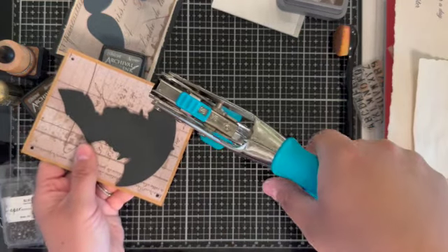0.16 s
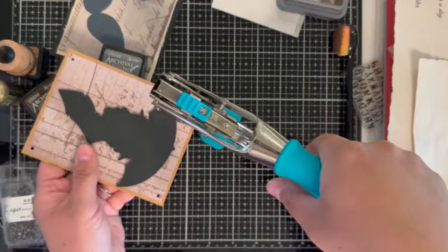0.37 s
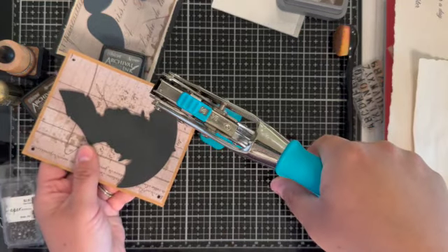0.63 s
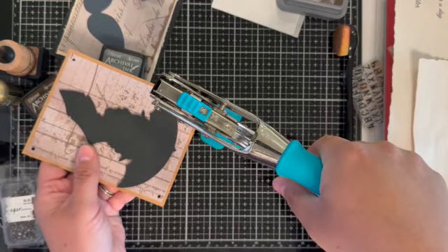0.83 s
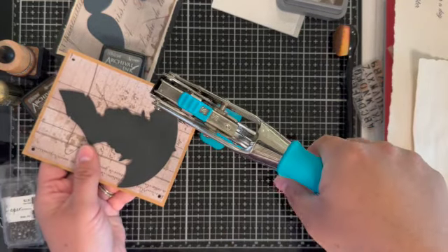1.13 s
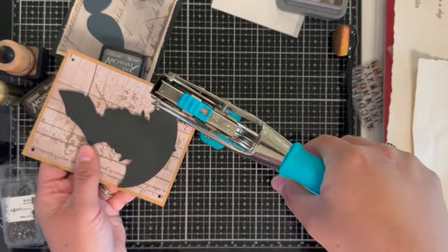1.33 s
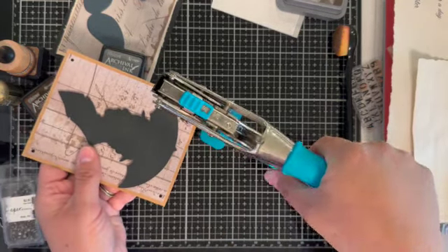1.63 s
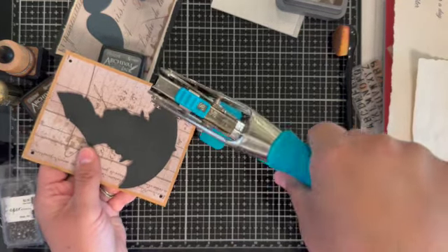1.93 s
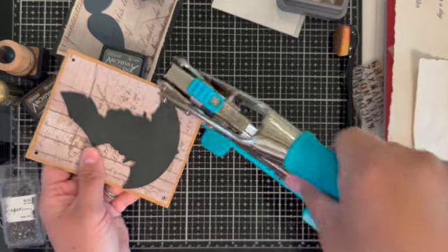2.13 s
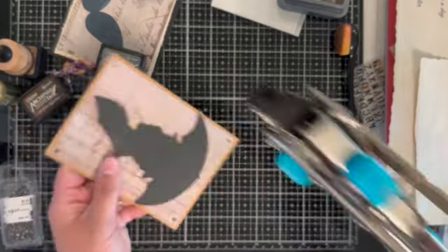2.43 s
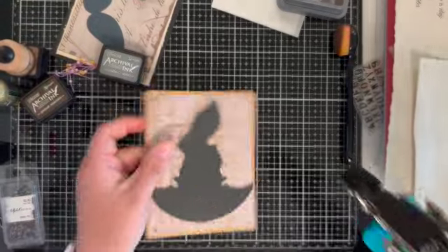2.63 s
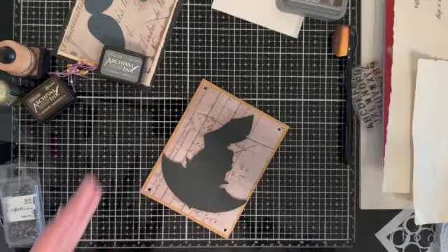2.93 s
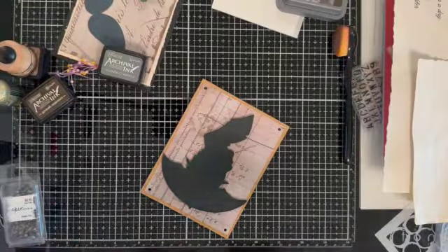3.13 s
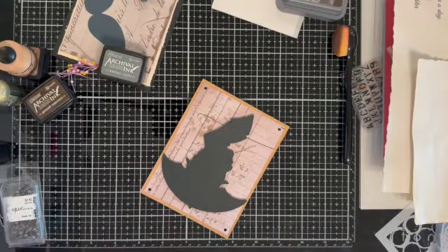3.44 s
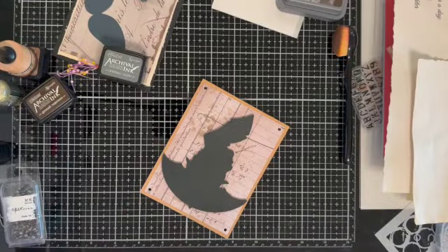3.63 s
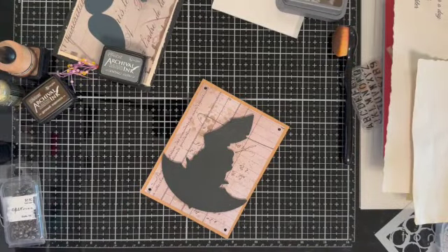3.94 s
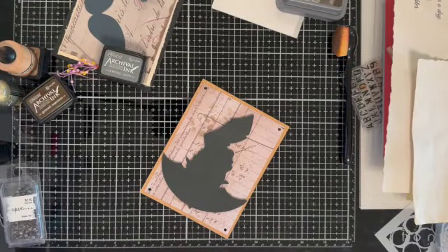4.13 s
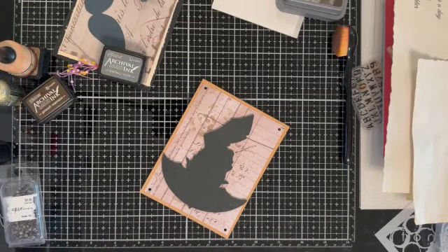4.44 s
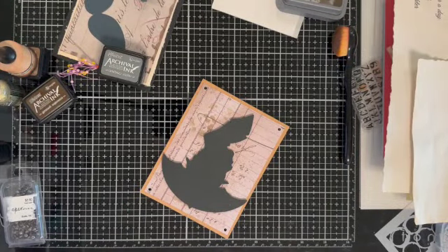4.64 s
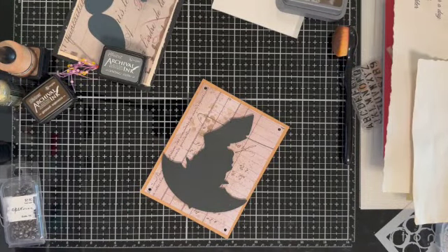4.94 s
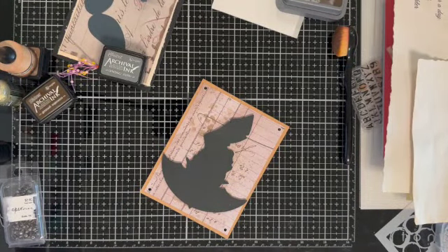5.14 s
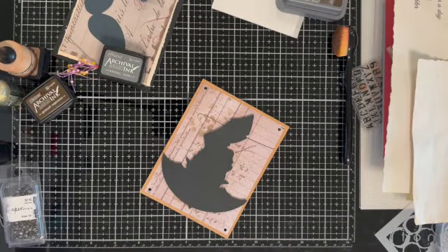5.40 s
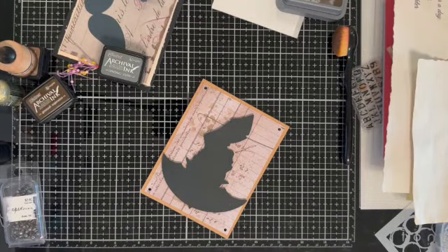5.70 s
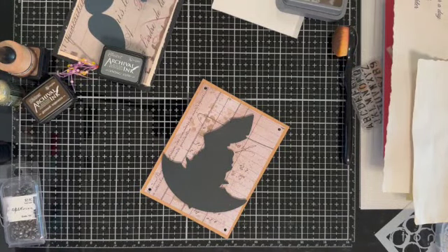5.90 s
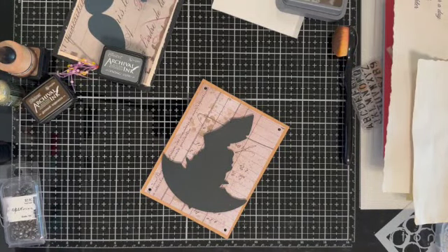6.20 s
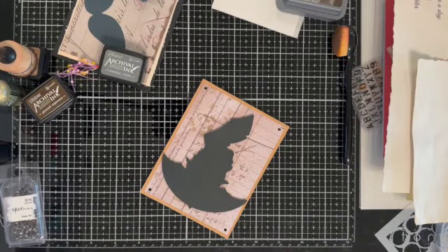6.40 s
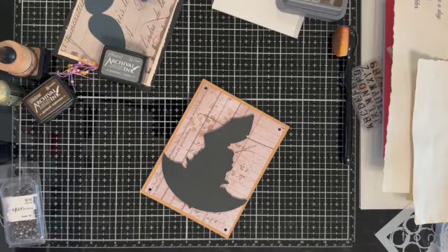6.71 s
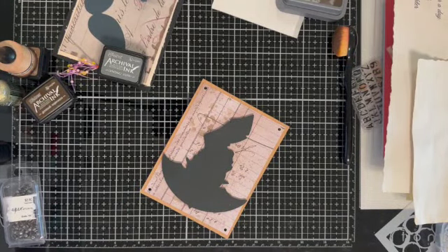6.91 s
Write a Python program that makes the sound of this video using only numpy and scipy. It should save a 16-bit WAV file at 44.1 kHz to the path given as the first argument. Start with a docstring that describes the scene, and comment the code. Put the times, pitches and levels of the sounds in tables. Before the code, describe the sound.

Close, a steel hand punch creaks, snaps through thick card and clacks open; later a drawer rolls, tools clatter, and it thumps shut over low hum.

```python
"""Mains hum and a throbbing low drone fill a small room; light taps, ticks and rubs follow over a desk.
Up close, a steel hand punch squeezes thick card: creaks are stick-slip pulses on the jaws' modes, snaps
are noise bursts over rings of die, frame and steel, and the break is a noise crunch with a modal thud.
Then the open tool clacks and the card is laid down. Further off a drawer rolls out on rumbling, singing
noise, the tool clatters into it, scrapes rasp, and it rolls shut with a thump of wooden modes."""
import sys
import numpy as np
from scipy import signal
from scipy.io import wavfile

SR = 44100
rng = np.random.default_rng(int(sys.argv[2]) if len(sys.argv) > 2 else 0)


def transcribe(u):
    """Save the signal u as a 16-bit wav file named by the first command-line argument.

    u: samples, shape (n,) or (channels, n), limited to [-1, 1]; the rate is SR.
    q: integer samples, one column per channel.
    """
    v = np.clip(np.atleast_2d(u).T, -1, 1)
    q = np.round(v * 32767).astype(np.int16)
    wavfile.write(sys.argv[1], SR, q)


N = 311346
TIME = np.arange(N) / SR  # s
CUTOFF_HZ = 16700
BREAK_S = 1.8325  # the die breaks through the card
OPEN_S = 2.0  # the hand lets go; from here snaps ring the sprung-open punch

# Table levels are relative; each layer adds its own trims.
# Steady hum tones: f/Hz, mean level/dB rms
HUM_TONES = [(120, -47), (193, -60.5), (241, -57), (440, -64), (481, -66.5)]
# The drone swells and sinks back: t/s at the top, level/dB, half length/s
DRONE_SURGES = [(0.103, -35, 0.14), (0.694, -34, 0.14), (2.776, -40.5, 0.22), (3.974, -42, 0.16)]
# Colour of still room air: f/Hz, level/dB per Hz
AIR_COLOUR = [(35, -12), (55, -5), (130, -15), (240, -17.5), (410, -25), (700, -28), (1000, -47),
              (2700, -53.5), (16000, -87)]
# Room decay: f/Hz, t60/s
ROOM_DECAY = [(100, 0.63), (500, 0.5), (2000, 0.52), (6000, 0.41), (14000, 0.22)]
# How far the echoes differ between channels: f/Hz, side level/dB
ECHO_SPREAD = [(250, -13.5), (550, -0.5), (1100, 0.5), (1900, -24.5), (3000, 3), (6500, -23),
               (10000, -34.5)]
# Bands where the drawer and thumps lean to one channel: f/Hz, width/Hz, share towards the left
DRAWER_LEAN = [(898, 480, -0.54), (2300, 480, 0.72)]
# All-pass phase turns of the left channel: f/Hz, width/Hz
LEFT_PHASE = [(4950, 325), (11700, 4170)]
# Soft blows on the desk and of the drawer, strongest as it meets its stops: t/s, level/dB, strongest f/Hz
THUMPS = [(1.345, -28.5, 120), (1.500, -29.5, 113), (5.369, -11.5, 150), (5.440, -18.5, 115),
          (5.464, -14.5, 340), (5.476, -9.5, 170), (5.510, -18, 62), (6.215, -19.5, 390),
          (6.992, -6.5, 490), (7.000, 1.5, 120), (7.018, -11, 74)]
# Modes of the ringing wood: f/Hz, level/dB, t60/s
WOOD_MODES = [(72.55, -5.5, 0.97), (108.4, 2, 0.11), (143.4, -1.5, 0.13), (171.8, 3, 0.15),
              (238.8, -16, 0.37), (326.5, -7.5, 0.052), (520, -7.5, 0.05)]
# Pushes on the drawer: start t/s, rumble level/dB at top speed, push/s, coast/s
DRAWER_PUSHES = [(4.42, -34, .24, .42), (5.42, -34, 0.088, 0.2), (6.14, -31.5, 0.14, .39)]
# Rough tones of the wheels at top speed: f/Hz, level/dB
WHEEL_TONES = [(205, -17), (315, -13), (510, -14), (880, -22)]
# Colour of the wheels' rumble: f/Hz, level/dB per Hz
RUMBLE_COLOUR = [(40, -7), (75, 5), (150, 6.5), (330, -9), (520, -7.5), (1000, -15), (2000, -19.5),
                 (3000, -61)]
# Colour of the wheels' hiss: f/Hz, level/dB per Hz
HISS_COLOUR = [(1500, -2), (2500, 4.5), (5000, -3.5), (8000, 1.5), (11000, -7.5), (16000, -26)]
# Knocks in the drawer: t/s, level/dB, decay/s, strongest f/Hz, fall to either side/dB per octave
CLATTER_HITS = [(5.356, -33.5, 0.009, 7940, 3.5), (5.365, -35.5, 0.073, 8000, -0.5),
                (5.508, -21, 0.013, 6050, 2.5), (5.717, -34.5, 0.0038, 7800, 12),
                (6.112, -39, 0.02, 4120, 3.5), (6.163, -33, 0.037, 7000, 3.5), (6.203, -20, 0.025, 2680, 4),
                (6.973, -39, 0.014, 6040, 0.5), (6.990, -21.5, 0.022, 1080, 4)]
# Colour of the knocks: f/Hz, level/dB per Hz
CLATTER_COLOUR = [(150, 13), (400, 19), (900, 13), (1400, 6), (2500, 3.5), (5000, 0.5), (8000, 7),
                  (11000, -9), (16000, -27)]
# Ring of the drawer's tray: f/Hz, level/dB, t60/s
TRAY_MODES = [(404, 7, 0.15), (780, 7, 0.044), (1260, -12, 0.14), (1920, -19, 0.037), (3940, -18, 0.15),
              (7400, -24, 0.042)]
# Things dragged over one another: t/s, level/dB, decay/s, f/Hz
SCRAPES = [(2.701, -39.5, 0.009, 1600), (3.931, -35.5, 0.042, 2400), (5.7003, -26, 0.023, 1300),
           (5.733, -34.5, 0.022, 1480), (5.983, -38.5, 0.018, 1390), (6.9977, -18.5, 0.0037, 1240)]
# Light taps and ticks of punch, card and fingers: t/s, level/dB, f/Hz
TAPS = [(0.031, -34, 1080), (0.542, -43.5, 7540), (0.728, -45, 1400), (1.034, -40.5, 1580),
        (1.538, -37, 900), (2.698, -18.5, 1460), (2.8798, -24, 3750)]
# Sliding card, steel and hands, and rustling clothes:
# t/s at full strength, hold/s, level/dB, rise/s, release/s, extra treble/dB
STROKES = [(1.14, 0.089, -58.5, 0.024, 0.084, 6), (1.246, 0.19, -51.5, 0.0046, 0.029, 5),
           (1.647, 0.016, -40, 0.002, 0.0078, 4.5), (1.784, 0.072, -35.5, 0.062, 0.057, -31),
           (2.116, 0.05, -37.5, 0.0062, 0.01, -2), (2.194, 0.039, -34.5, 0.0029, 0.0058, 4),
           (2.454, 0.1, -53.5, 0.029, 0.085, 7.5), (2.754, 0.028, -50.5, 0.092, 0.0073, 11.5),
           (2.844, 0.18, -60.5, 0.02, 0.055, 7.5), (3.387, 0.12, -49, 0.064, 0.08, -13),
           (3.929, 0, -44.5, 0.064, 0.21, -4), (4.515, 0.18, -43, 0.052, 0.037, -22),
           (5.713, 0.66, -43.5, 0.47, 0.21, -6)]
# Colour of the rubbing: f/Hz, level/dB per Hz
RUB_COLOUR = [(400, 5), (900, 4), (1900, 1), (3200, -4.5), (8400, -2.5), (11000, -5), (15000, -32)]
# Card creaks in the tightening jaws: t/s, length/s, level/dB rms, slips per s, strongest f/Hz
CREAKS = [(1.219, 0.014, -40.5, 325, 646), (1.239, 0.035, -35, 190, 489), (1.351, 0.058, -36.5, 187, 330)]
# Hollow knocks of the jaws, with one dull thud after them: t/s, level/dB, strongest f/Hz
HOLLOW_KNOCKS = [(1.326, -15.5, 326), (1.678, -24.5, 280), (1.748, -25.5, 305), (2.110, -28, 530),
                 (2.222, -24, 530), (3.415, -24.5, 217)]
# Hollow ring of the jaws: f/Hz, level/dB, t60/s
JAW_MODES = [(281.6, 1.5, 0.051), (367, 2.5, 0.092), (453, -7.5, 0.085), (630, 8, 0.049), (1100, -8, 0.042)]
# Ring of card and desk at the break: f/Hz, level/dB, t60/s
CARD_MODES = [(81, -11, 0.049), (284, -10, 0.049), (424, -21, 0.084), (620, -16, 0.18), (840, -14, 0.089),
              (1320, -35, 0.055)]
# Colour of the tearing fibres: f/Hz, level/dB per Hz
CRUNCH_COLOUR = [(150, -7), (650, 4.5), (1500, 6.5), (2500, -12), (5000, -52)]
# Colour of the freed card's shudder: f/Hz, level/dB per Hz
SHUDDER_COLOUR = [(80, 0), (220, 3), (450, -6.5), (900, -9.5), (2500, -55)]
# Clicks of the punch: t/s, crack level/dB, frame level/dB, frame f/Hz
SNAPS = [(1.13, -28.5, -36, 2800), (1.145, -25, -29, 3160), (1.3257, -27, -23.5, 1290),
         (1.336, -23.5, -28.5, 1480), (1.4133, -37, -28, 2760), (1.432, -27, -34, 4500),
         (1.657, -21.5, -33.5, 2940), (1.6712, -10.5, -22.5, 3900), (1.6793, -10.5, -17.5, 1370),
         (1.7332, -34, -24, 5000), (1.740, 0.5, -4, 1360), (1.7554, -17, -21.5, 1160),
         (1.774, -10.5, -31, 1280), (1.81, -21, -27, 1400), (2.100, -29, -27.5, 1170),
         (2.108, -7.5, -7.5, 1130), (2.1732, -14, -13, 1080), (2.2162, -4.5, -8, 1140),
         (2.228, -11.5, -15.5, 900), (2.255, -20, -25, 1100), (2.2723, -18, -19, 1030)]
# Colour of a crack: f/Hz, level/dB per Hz
CRACK_COLOUR = [(150, -30), (400, 8), (1300, -5.5), (2600, 2), (4500, 2), (8500, 2.5), (11000, -1.5),
                (16000, -22.5)]
# Heavily damped die and guide: f/Hz, level/dB squeezed, level/dB open, t60/s
DIE_MODES = [(1055, 1, -9, 0.025), (1800, -7, 1.5, 0.016), (3180, -13, -10, 0.012), (4510, -6.5, 4, 0.0098),
             (5460, -9.5, -3.5, 0.0088), (9020, -0.5, 1, 0.0041)]
# Ring of the steel: f/Hz, level/dB squeezed, level/dB open, t60/s
STEEL_MODES = [(865, -10.5, 10.5, 0.031), (1292, -4.5, 3.5, 0.06), (1395, 1.5, 1.5, 0.055),
               (1747, -9, 3.5, 0.035), (2210, -15.5, -11, 0.05), (2610, 0.5, -17, 0.064),
               (3194, -7, -15, 0.039), (3840, -8, -21, 0.04), (5600, -18.5, -16, 0.041)]


def from_db(db):
    """Decibels to gain."""
    return 10 ** (np.asarray(db) / 20)


def rms_one(x):
    """Scale to unit rms."""
    return x / np.sqrt(np.mean(x ** 2) + 1e-20)


def at_hz(points, hz):
    """Read a table on a log-frequency axis."""
    f, value = np.transpose(points)
    return np.interp(np.log(hz), np.log(f), value)


def octaves_off(hz, pitch):
    """Distance from a favoured pitch in octaves."""
    return abs(np.log2(hz / pitch))


def drift(rate):
    """Random wander: normal knots of spread 1, rate per second, joined by straight lines."""
    knots = rng.standard_normal(int(rate * N / SR) + 2)
    return np.interp(TIME * rate, np.arange(len(knots)), knots)


def filtered(x, order, hz, kind):
    """Butterworth filter."""
    return signal.sosfilt(signal.butter(order, hz, kind, fs=SR, output="sos"), x)


def noise_bands(size):
    """Half-octave bands of noise as (centre Hz, samples); neighbours are unrelated."""
    edges = 33 * 2 ** np.arange(0, 9.1, .5)
    white = rng.standard_normal((2, size))
    bands = []
    for k, (lo, hi) in enumerate(zip(edges, edges[1:])):
        bands.append((np.sqrt(lo * hi), filtered(white[k % 2], 2, [lo, hi], "band")))
    return bands


def noise(spectrum):
    """Coloured noise of unit rms."""
    return rms_one(sum(from_db(at_hz(spectrum, hz)) * band for hz, band in noise_bands(N)))


def around(x, hz, ratio=1.68):
    """Keep the band round a pitch."""
    return filtered(x, 2, [hz / ratio, min(hz * ratio, SR / 2 - 1)], "band")


def swell(rise_s, decay_s, size=SR // 2):
    """An envelope that rises and dies away; top 1."""
    t = TIME[:size]
    shape = (1 - np.exp(-(t / rise_s) ** 2)) * np.exp(-t / decay_s)
    return shape / shape.max()


def stroke(s, hold_s, rise_s, release_s):
    """Pressure grows, holds and lets go; top 1."""
    before = np.maximum(s - TIME, 0)
    after = np.maximum(TIME - s - hold_s, 0)
    return np.exp(-before / rise_s - after / release_s)


def mode(hz, t60, rise_cycles):
    """A struck mode builds up over some cycles, so lows come later."""
    envelope = swell(rise_cycles / hz, t60 / np.log(1000))
    return envelope * np.sin(2 * np.pi * hz * TIME[:SR // 2])


def focused_ring(modes, pitch, db, focus_db, rise_cycles):
    """Ring a body's modes, weaker by focus_db for each octave away from the favoured pitch."""
    return sum(from_db(db + level - focus_db * octaves_off(hz, pitch)) * mode(hz, t60, rise_cycles)
               for hz, level, t60 in modes)


def add(track, s, sound):
    """Mix a sound in at a time."""
    i = int(s * SR)
    track[i:i + len(sound)] += sound[:N - i]


def burst(source, envelope):
    """A random stretch of noise under an envelope, with the envelope's energy."""
    i = int(rng.random() * (N - len(envelope)))
    return rms_one(source[i:i + len(envelope)] * envelope) * np.sqrt(np.mean(envelope ** 2))


def knocks(blows, modes, focus_db):
    """Soft blows ring a body most strongly near the pitch that each contact favours."""
    out = np.zeros(N)
    for s, db, pitch in blows:
        add(out, s, focused_ring(modes, pitch, db, focus_db, rise_cycles=0.75))
    return out


def phase_turn(x, hz, width):
    """All-pass resonance: delays what lies near its pitch."""
    b, a = signal.iirnotch(hz, hz / width, fs=SR)
    return signal.lfilter(a[::-1], a, x + 1e-18)


def diffuse(mid, side, apart_hz=380):
    """Sound from all round is alike in both channels in the bass, different above."""
    return mid + filtered(side, 2, apart_hz, "high") * [[1], [-1]]


def background(drone_hz=43.4, drone_db=-52.0, overtone_db=-13.0, air_db=-44.0, air_side_db=-0.5):
    """Wavering mains hum, a throbbing drone with its octave, and still room air."""
    hum = np.zeros(N)
    for hz, db in HUM_TONES:
        level = np.sqrt(2) * from_db(db + drift(rate=2.97))
        hum += level * np.sin(2 * np.pi * hz * TIME + 0.57 * drift(rate=3.07))
    turn = 2 * np.pi * drone_hz * TIME + 2.46 * drift(rate=1.0)
    throb = np.full(N, from_db(drone_db))
    for s, db, half_s in DRONE_SURGES:
        throb += from_db(db) * np.exp(-((TIME - s) / half_s) ** 2)
    drone = np.sqrt(2) * throb * (np.sin(turn) + from_db(overtone_db) * np.sin(2 * turn))
    air = diffuse(noise(AIR_COLOUR), from_db(air_side_db) * noise(AIR_COLOUR))
    return hum + drone + from_db(air_db) * air


def room(x):
    """Diffuse echoes, a noise tail that dies band by band."""
    t = TIME[:SR // 2]
    mid, side = np.zeros(len(t)), np.zeros(len(t))
    for hz, band in noise_bands(len(t)):
        mid += band * from_db(-60 * t / at_hz(ROOM_DECAY, hz))
    for hz, band in noise_bands(len(t)):
        side += band * from_db(at_hz(ECHO_SPREAD, hz) - 60 * t / at_hz(ROOM_DECAY, hz))
    echoes = diffuse(mid, side) * (1 - np.exp(-(t / 0.00105) ** 2))  # soft onset
    echoes = echoes / np.sqrt(np.sum(echoes ** 2) / 2)
    return signal.fftconvolve(x[None], echoes, axes=1)[:, :N]


def off_axis(x):
    """Sound from beside the desk is coloured differently in each channel."""
    side = np.zeros(N)
    for hz, width, share in DRAWER_LEAN:
        side += share * signal.lfilter(*signal.iirpeak(hz, hz / width, fs=SR), x + 1e-18)
    return x + side * [[1], [-1]]


def wood_thumps(level_db=-3.5):
    """Soft blows on the desk and of the drawer ring the wood."""
    return from_db(level_db) * knocks(THUMPS, WOOD_MODES, focus_db=6.0)


def runners(hiss_db=-16.0, bump_db=4.0, glide=.25, tone_width_hz=35):
    """Drawer wheels rumble, sing and hiss over small bumps; level and pitch sink as the drawer slows."""
    speed = np.zeros(N)
    for s, db, push_s, coast_s in DRAWER_PUSHES:
        add(speed, s, from_db(db) * swell(push_s, coast_s, size=N))
    turn = 2 * np.pi * np.cumsum((speed / speed.max()) ** glide) / SR
    tones = np.zeros(N)
    for hz, db in WHEEL_TONES:
        # two independent drifts roughen each tone into a narrow band
        rough = drift(tone_width_hz) * np.sin(hz * turn) + drift(tone_width_hz) * np.cos(hz * turn)
        tones += from_db(db) * rough
    bumps = from_db(bump_db * drift(rate=51))
    return speed * bumps * (noise(RUMBLE_COLOUR) + tones + from_db(hiss_db) * noise(HISS_COLOUR))


def scraping(grain_db=6.5, grains_per_s=300):
    """Dragged things rasp: a quick start, then a dying run of coarse grains."""
    out, white = np.zeros(N), rng.standard_normal(N)
    grains = white * from_db(grain_db * drift(rate=grains_per_s))
    for s, db, decay_s, hz in SCRAPES:
        add(out, s, from_db(db) * burst(around(grains, hz), swell(0.0012, decay_s)))
    return out


def clatter(level_db=-0.5, rattle_db=7.5, first_db=4.0, tray_db=-7.5):
    """Loose tools knock in the tray: a hard first contact, a quick uneven rattle, and the tray's ring."""
    out, bands = np.zeros(N), noise_bands(N)
    contacts = from_db(rattle_db * drift(rate=540))
    for s, db, decay_s, pitch, fall_db in CLATTER_HITS:
        colour = np.zeros(N)
        for hz, band in bands:
            colour += from_db(at_hz(CLATTER_COLOUR, hz) - fall_db * octaves_off(hz, pitch)) * band
        colour = rms_one(colour)
        add(out, s, from_db(db + first_db) * burst(colour, swell(0.0013, 0.0046)))
        add(out, s, from_db(db + level_db) * burst(colour * contacts, swell(0.0042, decay_s)))
        add(out, s, focused_ring(TRAY_MODES, pitch, db + tray_db, fall_db, rise_cycles=1.0))
    return out


def handling(tap_db=-6.5, grain_db=1.5, catch_db=3.0, rest_db=-72.5, treble_hz=5000):
    """Punch, card and fingers tap and tick; card, steel, hands and clothes rub with a fine, catching grain."""
    grain = from_db(grain_db * drift(rate=110) + catch_db * drift(rate=23))
    rub = grain * noise(RUB_COLOUR)
    treble = filtered(rub, 1, treble_hz, "high")
    out = from_db(rest_db) * rub  # the hands are never quite still
    for s, hold_s, db, rise_s, release_s, treble_db in STROKES:
        slide = rub + (from_db(treble_db) - 1) * treble
        out += from_db(db) * stroke(s, hold_s, rise_s, release_s) * slide
    white = rng.standard_normal(N)
    for s, db, hz in TAPS:
        add(out, s, from_db(db + tap_db) * burst(around(white, hz), swell(0.00025, 0.0024)))
    return out


def creaking(jitter=0.15, focus_db=14.5):
    """The card sticks and slips in quick, uneven runs that keep the jaws ringing, favouring a pitch per run."""
    out = np.zeros(N)
    for s, length_s, db, rate, pitch in CREAKS:
        ring = focused_ring(JAW_MODES, pitch, 0, focus_db, rise_cycles=1.0)
        slips = np.zeros(int(length_s * SR))
        gaps = abs(1 + jitter * rng.standard_normal(size=40))
        at = (np.cumsum(gaps) * SR / rate).astype(int)
        slips[at[at < len(slips)]] = 1
        run = signal.fftconvolve(slips, ring)
        # set the level over the slipping time, not over the ring-out
        add(out, s, from_db(db) * np.sqrt(len(slips) / len(run)) * rms_one(run))
    return out


def hollow_knocks(level_db=0.0):
    """The jaws knock with a hollow ring, and one dull thud comes after them."""
    return from_db(level_db) * knocks(HOLLOW_KNOCKS, JAW_MODES, focus_db=17.5)


def cutting(crunch_db=-15.5, crunch_rise_s=0.017, crunch_s=0.0058, grain_db=3.5,
            shudder_db=-29.5, shudder_s=0.067):
    """The card's fibres give way in a ragged crunch and a thud, and the freed card shudders."""
    out = np.zeros(N)
    ragged = from_db(grain_db * drift(rate=300))
    crunch = burst(noise(CRUNCH_COLOUR) * ragged, swell(crunch_rise_s, crunch_s))
    add(out, BREAK_S - .004, from_db(crunch_db) * crunch)
    for k, (hz, db, t60) in enumerate(CARD_MODES):
        add(out, BREAK_S, (-1) ** k * from_db(db) * mode(hz, t60, rise_cycles=1.0))
    shudder = burst(noise(SHUDDER_COLOUR) * ragged, swell(0.023, shudder_s))
    add(out, BREAK_S, from_db(shudder_db) * shudder)
    return out


def struck(modes, opened, contact_hz, spread_db, detune, light_db=6.5):
    """A blow on squeezed or open modes; high contacts spare the lows, the grip varies strength and pitch."""
    out = np.zeros(SR // 2)
    for hz, squeezed_db, open_db, t60 in modes:
        level = open_db if opened else squeezed_db
        level -= light_db * max(np.log2(contact_hz / hz), 0)
        gain = from_db(level + spread_db * rng.normal()) * rng.choice([-1, 1])
        out += gain * mode(hz * (1 + detune * rng.normal()), t60, rise_cycles=0.72)
    return out


def punch(crack_db=-8.0, die_db=-7.0, frame_db=3.5, frame_t60=0.0078, steel_db=-15.5,
          crack_rise_s=0.00065, crack_s=0.0024, chatter_db=-30.0, chatter_s=0.014):
    """Each slip cracks in the die, jolts the hand-damped frame, rings the steel and chatters its joints."""
    out, grit = np.zeros(N), noise(CRACK_COLOUR)
    for s, db, body_db, hz in SNAPS:
        opened = s > OPEN_S
        die = struck(DIE_MODES, opened, hz, spread_db=2.5, detune=0.016)
        steel = struck(STEEL_MODES, opened, hz, spread_db=0.0, detune=0.0054)
        add(out, s, from_db(db + crack_db) * burst(grit, swell(crack_rise_s, crack_s)))
        add(out, s, from_db(body_db + die_db) * die)
        add(out, s, from_db(db + chatter_db) * burst(grit, swell(0.0071, chatter_s)))
        add(out, s, from_db(body_db + frame_db) * mode(hz, frame_t60, rise_cycles=0.28))
        add(out, s, from_db(body_db + steel_db) * steel)
    return out


def dispersed(x, low_hz=100, high_hz=5000, count=8):
    """Bending waves carry highs faster than lows, so a click becomes a short falling chirp."""
    for hz in np.geomspace(low_hz, high_hz, count):
        x = phase_turn(x, hz, hz * 1.3)
    return x


def scene(near_wet_db=-17.5, far_wet_db=-5.0, far_direct_db=-1.5, thump_wet_db=-5.0):
    """The punch is close and dry, the drawer further off in the room."""
    near = dispersed(punch() + hollow_knocks() + cutting()) + creaking() + handling()
    far = runners() + clatter() + scraping()
    thumps = wood_thumps()
    send = from_db(near_wet_db) * near + from_db(far_wet_db) * far + from_db(thump_wet_db) * thumps
    return near + off_axis(from_db(far_direct_db) * far + thumps) + room(send) + background()


def record(dry):
    """Turn the left channel's treble phase, cut deep bass, round the peaks and cut the top."""
    left, right = dry
    for hz, width in LEFT_PHASE:
        left = phase_turn(left, hz, width)
    x = filtered(np.array([left, right]), 4, 30, "high")
    rounded = 1.3 * np.tanh(x / 1.3)
    return signal.sosfilt(signal.cheby2(14, 60, CUTOFF_HZ, fs=SR, output="sos"), rounded)


dry = scene()
out = record(dry)
transcribe(out)
```